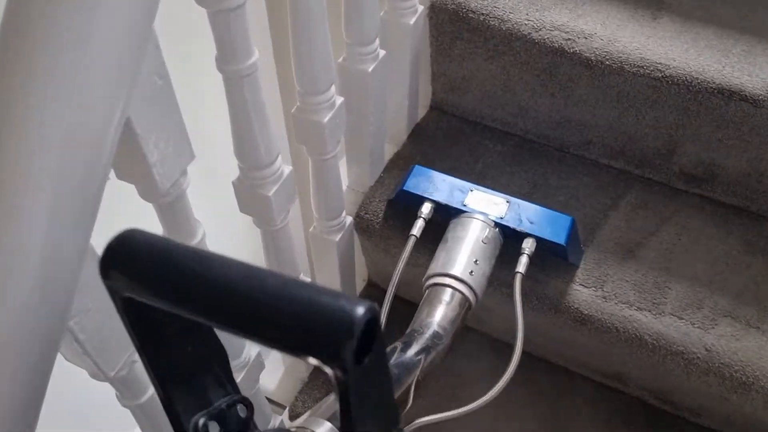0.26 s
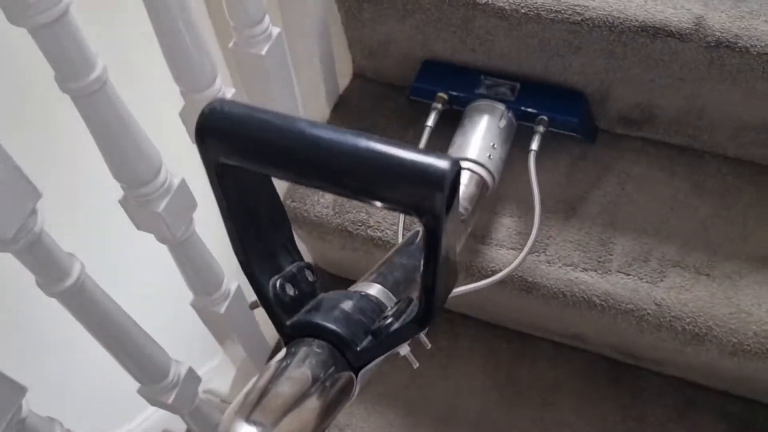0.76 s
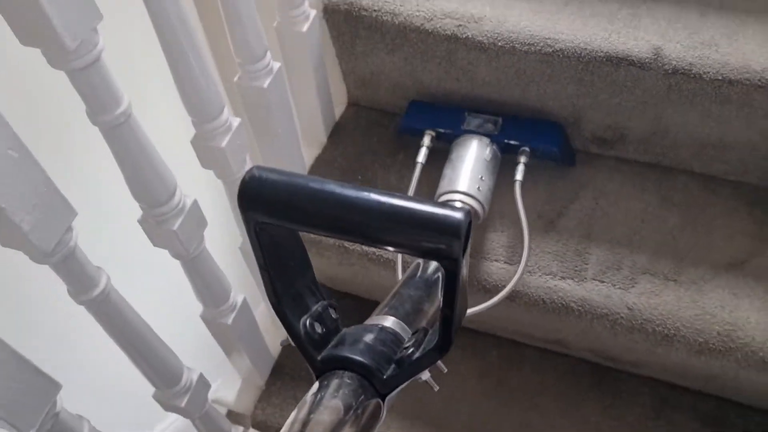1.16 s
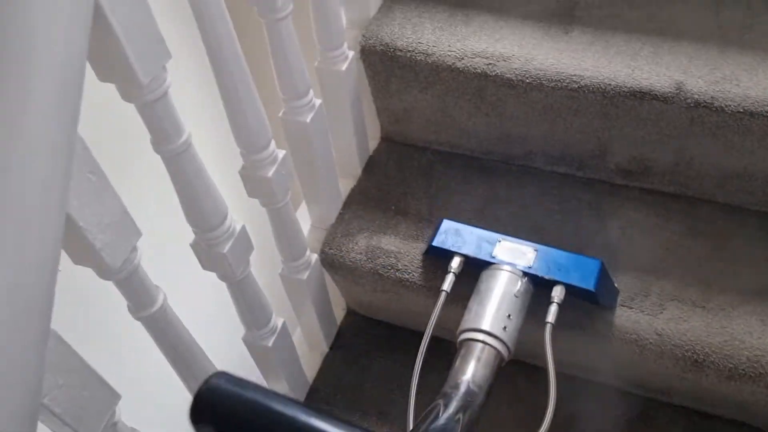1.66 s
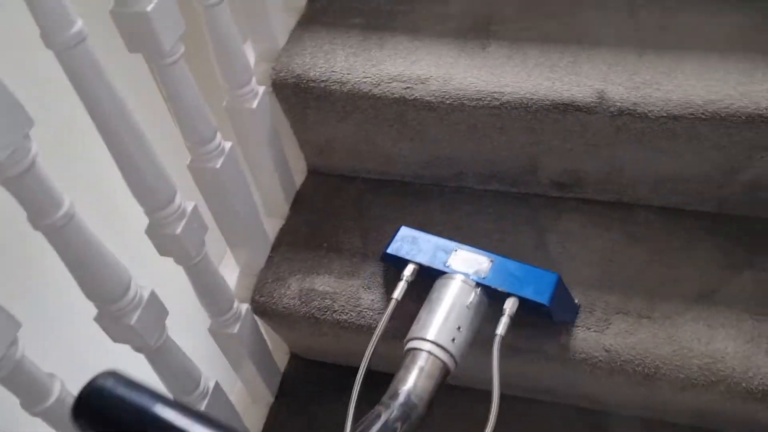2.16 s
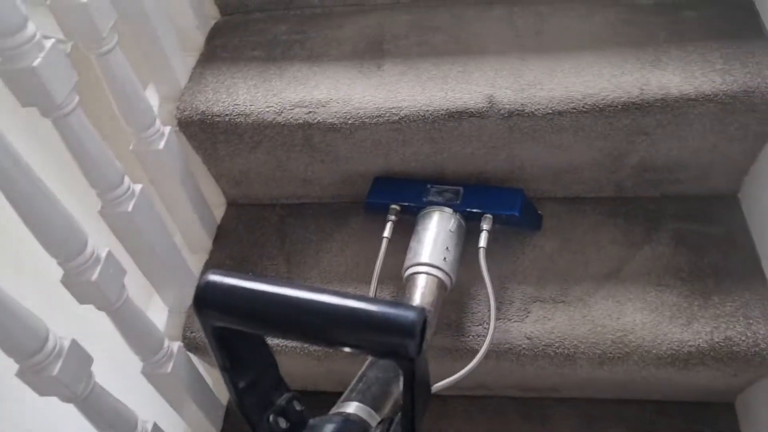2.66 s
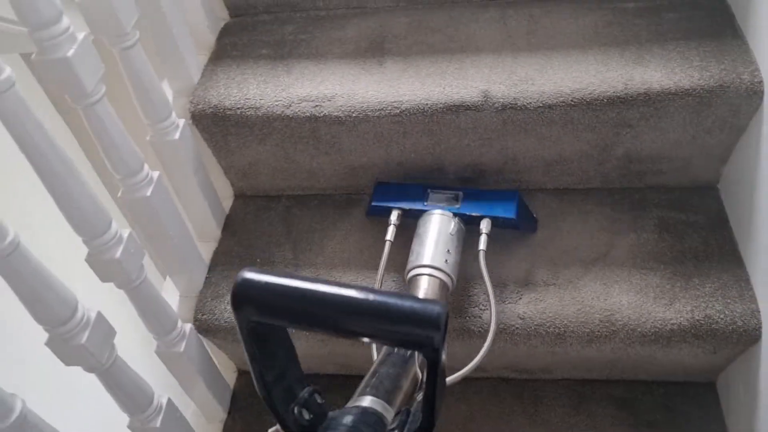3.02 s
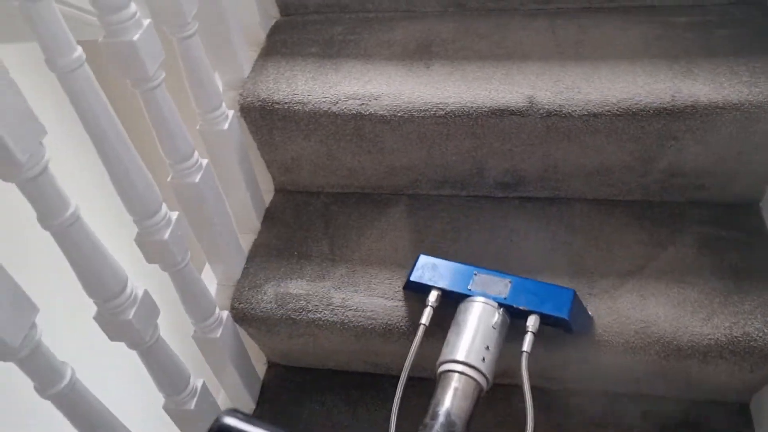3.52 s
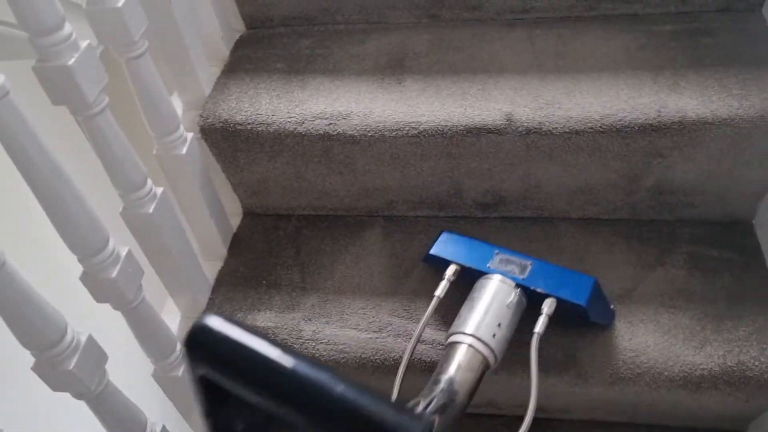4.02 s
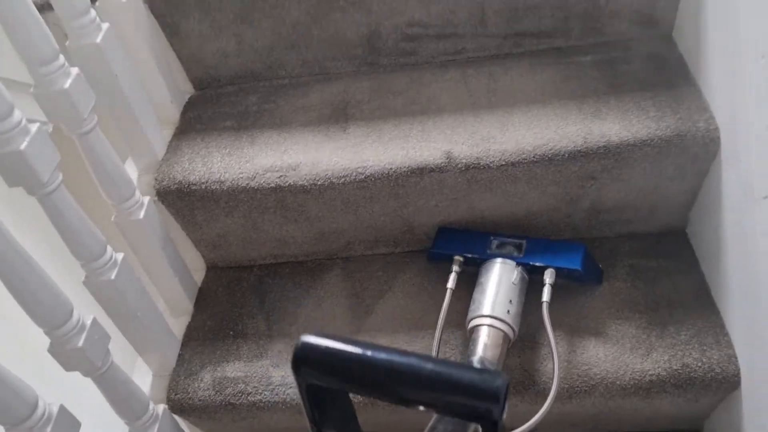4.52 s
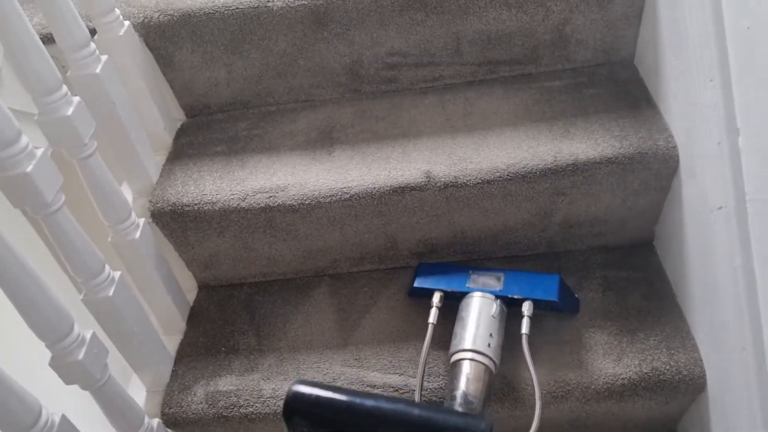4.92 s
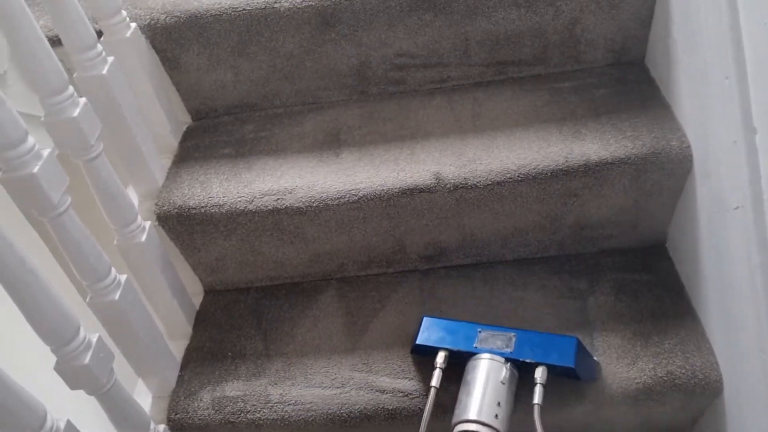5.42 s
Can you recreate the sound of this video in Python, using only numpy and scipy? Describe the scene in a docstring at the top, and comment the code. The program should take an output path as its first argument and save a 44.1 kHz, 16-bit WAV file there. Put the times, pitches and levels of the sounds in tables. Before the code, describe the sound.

A carpet-cleaning wand works on a carpeted staircase, heard close from behind the handle in stereo. Air suction rushes throughout over a dull distant vacuum drone. Three bright spray bursts open with sharp trigger clacks and wet spits; between them the head rubs forward over the pile and thuds softly against the riser. Splutters of sucked water follow the first two bursts, and knocks echo briefly in the stairwell.

```python
"""A carpet extraction wand cleans a carpeted wooden staircase, heard from just behind its handle.
The trigger valve clacks and filtered noise and droplet clicks hiss as water jets on each backward stroke.
Suction is a resonant air rush; the nozzle slurps in splutters of drops and noise at the stair's edge.
Between sprays the head rubs forward over the pile and bumps or grazes the riser: struck modes and tiny slips.
A vacuum unit drones dully underneath, and the knocks echo in the stairwell."""
import sys
import numpy as np
from scipy import signal
from scipy.fft import rfft, irfft, next_fast_len
from scipy.io import wavfile

SR = 44100
rng = np.random.default_rng(int(sys.argv[2]) if len(sys.argv) > 2 else 0)


def master(y):
    """Save y as 16-bit WAV."""
    cut = np.clip(np.atleast_2d(y).T, -1, 1)
    pcm = np.round(cut * 32767)  # scale
    wavfile.write(sys.argv[1], SR, pcm.astype(np.int16))


N = 250488
TIME = np.arange(N) / SR

# One trigger squeeze per backward stroke; a negative time lies before the start:
# (opens [s], closes [s], pressure bleed-off [s], hiss before brightening [dB], edge brightening [dB])
SQUEEZES = [(-0.9, 0.085, 0.022, -25.5, 0.5), (0.91, 1.948, 0.072, -27, 4.5),
            (2.724, 3.63, 0.067, -26.8, 2), (4.5, 5.477, 0.029, -27.5, 2.5)]
# Valve snapping: (time [s], level [dB], contact cut-off [Hz])
VALVE_SNAPS = [(.08, -5, 720), (.9166, -2, 12100), (.9195, 0, 2490), (2.7275, 1.5, 9000), (4.498, -4, 2540),
               (4.5014, -3, 12000), (4.504, -4.5, 894), (5.478, -5.5, 700)]
# Ringing modes of valve and wand tube: (frequency [Hz], level [dB], t60 [s])
WAND_MODES = [(104.3, -37, 0.084), (179, -30.5, 0.25), (236.5, -39, 0.24), (415, -27, 0.019),
              (766, -21.5, 0.016), (1350, -20, 0.012), (2050, -14.5, 0.0069), (2570, -17, 0.031),
              (3290, -15.5, 0.0048), (5100, -9, 0.0033), (6380, -5.5, 0.003), (12300, -11.5, 0.0036)]
# Head pushed forward over the pile:
# (starts [s], meets the riser [s], rubbing [dB], suction change at full speed [dB],
#  suction change against the riser [dB], slot resonance [Hz], leak whistle [Hz])
FORWARD_PUSHES = [(0.41, 0.705, -32, 1.5, -4.3, 1600, 2450), (2.24, 2.498, -39, 1.7, 0.7, 1780, 2550),
                  (4.019, 4.279, -42, 0, -3.8, 1480, 2860)]
# Head knocking on the stair: (time [s], level [dB], contact cut-off [Hz], weight on the tread [0-1])
STAIR_BUMPS = [(0.712, -5, 350, 0.8), (0.743, 1.5, 130, 0.9), (1.925, 2, 170, 0.06),
               (2.481, -7.5, 3050, 0.34), (2.509, -5.5, 150, 0.95), (2.548, -3.5, 130, 0.13),
               (4.2565, 2, 4000, 0.1), (4.282, -4.5, 800, 0.2), (4.327, -0.5, 160, .1)]
# Ringing modes of stair and nozzle head: (frequency [Hz], level [dB], t60 [s])
STAIR_MODES = [(95, -28, .24), (190, -35, .22), (310, -33, .16), (400, -30.5, .1), (520, -31, .07),
               (1330, -25, .04), (3480, -35, .12)]
# Nozzle lifting at the stair's edge:
# (starts [s], attack [s], hold [s], release [s], gargle [dB], lip flutter [dB])
NOZZLE_LIFTS = [(1.908, 0.026, 0.013, 0.044, -24, -27.5), (3.566, 0.039, 0.03, 0.05, -25, -27.5),
                (3.63, 0.09, 0.1, 0.067, -14.7, -26.3)]
# Head grazing the riser: (time [s], level [dB], decay [s])
RISER_GRAZES = [(2.476, -33.5, 0.015), (4.207, -30.5, 0.032), (4.257, -27, 0.016)]
# Resonances of the metal head under a graze: (frequency [Hz], width [Hz], level [dB])
HEAD_RESONANCES = [(1400, 530, 5), (2000, 570, -5), (3370, 190, -30)]
# Resonances of the gap between head and riser: (frequency [Hz], width [Hz], level [dB])
CORNER_RESONANCES = [(740, 520, -2), (1700, 160, -10), (3480, 210, -2), (4060, 240, -4.5)]

# Relative noise spectra of each source: (frequency [Hz], level [dB per Hz])
JET_SPECTRUM = [(150, -17.5), (650, -15), (950, -5.5), (1700, -2.5), (2150, -4.6), (3000, -1.6),
                (4100, -0.9), (4600, -3), (7700, -2.5), (8600, -8.5), (11300, -12.5), (12500, -8.5),
                (15700, -8)]
AIR_SPECTRUM = [(120, -5), (400, -9), (680, -6.5), (950, -4.5), (1250, -7), (1600, -3.5), (2200, -1.5),
                (3200, -2), (4400, -4), (7500, -8), (9000, -13.5), (11300, -13), (13000, -10), (15700, -11)]
MACHINE_SPECTRUM = [(14, -19), (50, -2), (75, -3.5), (98, 6), (125, -7), (200, -9.5), (400, -22.5)]
PILE_SPECTRUM = [(60, 4.5), (110, -1.5), (220, 5.5), (350, -3.5), (560, 1.5), (900, -4.5), (1600, -2.5),
                 (2400, -13), (4500, -29)]
GARGLE_SPECTRUM = [(330, -1.5), (470, -6.5), (750, -5), (1000, 0.5), (1300, -3.5), (1600, 3), (2000, -1),
                   (2400, 0.5), (3000, -0.8), (3500, -6.5), (4900, -5.5), (6600, -11.5), (9500, -22.5),
                   (16000, -19)]
FLUTTER_SPECTRUM = [(60, -12), (98, 5), (140, -4.5), (200, 4.5), (270, -8), (340, -7), (450, -10),
                    (1000, -25.5)]
# Likeness of the two microphones: (frequency [Hz], left-right correlation [-1 to 1])
MIC_LIKENESS = [(100, 1), (270, 1), (500, 0.4), (800, 0.4), (1200, 0.55), (1800, 0.5), (2400, 0.15),
                (4000, 0.18), (16000, 0.05)]
# Stereo balance of the spray: (frequency [Hz], left minus right [dB])
SPRAY_BALANCE = [(300, 2), (600, -3), (1200, 1), (1700, -11), (2600, -1.5), (4300, -7.5), (5200, -3),
                 (6800, 1.5), (8600, -1), (10400, -5.5), (11300, 3), (12500, -5.5), (15000, 1.5)]
# Stereo balance of the other noises: (frequency [Hz], left minus right [dB])
NOISE_BALANCE = [(60, 2), (180, -3.5), (550, 0), (1700, -4.5), (5000, -2), (15000, -2)]

LEFT_LAG_S = 0.00036   # the wand is a little to the right
VALVE_TRAVEL_S = 0.011   # from shut to fully open
EDGE_S, EDGE_RISE_S = 0.37, 0.27   # jets near the edge this long before closing; on it this much later
PUSH_CURVE, PUSH_STOP_S = 0.4, 0.05   # speed: power of the way covered; decay on meeting the riser
SEAL_S = 0.052   # the slot closes on the carpet in this time
TREAD_HZ, TREAD_DB, TREAD_T60_S = 54, -20.5, .5   # boom of a wooden step
FLUTTER_STOP_S = 0.034   # the lip settles sooner than the water
STAIRWELL_T60_S = 0.21
END_S, CUTOFF_HZ = 5.648, 15850


def from_db(db):
    """Decibels to gain."""
    return 10 ** (np.asarray(db) / 20)


def rms_one(x):
    """Scale to rms 1."""
    return x / np.sqrt(np.mean(x ** 2) + 1e-20)


def at_hz(points, hz):
    """Read a table on a log-frequency axis."""
    f, value = np.transpose(points)
    return np.interp(np.log(hz), np.log(f), value)


def cut(x, hz, kind, order=2):
    """Butterworth filter."""
    sos = signal.butter(order, np.clip(hz, 10, .45 * SR), kind, fs=SR, output="sos")
    return signal.sosfilt(sos, x + 1e-18)


def rush(x, hz, width_hz):
    """A broad resonance with gain 1 on top."""
    r = np.exp(-np.pi * width_hz / SR)
    top = np.array([1, 0, -1]) * (1 - r * r) / 2
    return signal.lfilter(top, [1, -2 * r * np.cos(2 * np.pi * hz / SR), r * r], x)


def ring(force, hz, t60):
    """A unit click sets a sine of height 1 ringing."""
    r, w = from_db(-60 / (t60 * SR)), 2 * np.pi * hz / SR
    return signal.lfilter([0, np.sin(w)], [1, -2 * r * np.cos(w), r * r], force + 1e-18)


def drift(rate):
    """Smooth chance of rms 1, changing about rate times a second."""
    step = 40   # samples between slow values
    r = np.exp(-2 * np.pi * rate * step / SR)
    chance = rng.standard_normal(N // step + 2002)
    slow = signal.lfilter([1], [1, -2 * r, r * r], chance)[2000:]   # drop the settling
    return np.interp(np.arange(N) / step, np.arange(len(slow)), rms_one(slow))


def turbulence():
    """Two unrelated white noises."""
    return rng.standard_normal((2, N))


def drops(per_s, spread_db):
    """Two random trains of droplet impacts of uneven size, at rms 1."""
    sizes = from_db(spread_db * np.minimum(rng.exponential(1, (2, N)), 4))
    landing = rng.random((2, N)) < per_s / SR
    return rms_one(landing * sizes * rng.choice([-1, 1], (2, N)))


def colour(pair, spectrum, balance):
    """Give two unrelated signals a spectrum and spread them over the microphones; rms 1."""
    size = next_fast_len(N)
    hz = np.maximum(np.fft.rfftfreq(size, 1 / SR), 1)
    bass_fall = np.minimum(hz / spectrum[0][0], 1) ** 2   # below the first point
    mid, side = rfft(pair, size) * from_db(at_hz(spectrum, hz)) * bass_fall
    alike = np.clip(at_hz(MIC_LIKENESS, hz), -1, 1)
    sides = np.array([[1], [-1]])
    both = np.sqrt(1 + alike) * mid + sides * np.sqrt(1 - alike) * side
    both = both * from_db(sides * at_hz(balance, hz) / 2)
    both[0] *= np.exp(-2j * np.pi * hz * LEFT_LAG_S)
    return rms_one(irfft(both, size)[:, :N])


def near_walls(x, echo, sway_s, count=4):
    """Echoes off steps and banister comb the hiss; their paths shift as the wand moves."""
    out, travel = x.copy(), drift(.4)
    for channel in range(2):
        for lag_s in rng.uniform(.001, .012, count):
            path_s = lag_s + sway_s * rng.normal() * travel
            source = np.arange(N) - np.round(path_s * SR).astype(int)
            out[channel] += echo * x[channel, np.clip(source, 0, N - 1)]
    return rms_one(out)


def ramp(s, length_s):
    """Straight rise from zero at s seconds to one, length_s later."""
    return np.clip((TIME - s) / length_s, 0, 1)


def release(s, decay_s):
    """One until s seconds, then dying away exponentially."""
    return np.exp(-np.maximum(TIME - s, 0) / decay_s)


def since(s, decay_s=np.inf):
    """Rises from zero to one as the valve opens around s seconds, dying away if given a decay."""
    return ramp(s - VALVE_TRAVEL_S / 2, VALVE_TRAVEL_S) ** 2 * release(s, decay_s)


def push_speed(starts, stops):
    """The head gathers speed, from zero to one, until the riser stops it."""
    return ramp(starts, stops - starts) ** PUSH_CURVE * release(stops, PUSH_STOP_S)


def jets(droplets=0.6, sizzle_db=-3.3, mist_db=-3, fresh_mist_db=6, fresh_s=0.44,
         edge_hiss=-0.13, edge_mist=0.88, retreat_s=0.73, waver_db=1.7):
    """Water atomises finest just as the valve opens, brightens at the edge and dies as pressure bleeds off."""
    water = turbulence() + droplets * drops(5000, spread_db=2.5)
    spray = near_walls(colour(water, JET_SPECTRUM, SPRAY_BALANCE), echo=0.18, sway_s=.0002)
    gains, in_corner = np.zeros((3, 1, N)), 0   # hiss, sizzle and fine mist
    for opens, closes, bleed_s, level_db, edge_db in SQUEEZES:
        pressure = since(opens) * release(closes, bleed_s)
        bright = edge_db * np.sin(np.pi / 2 * ramp(closes - EDGE_S, EDGE_RISE_S)) ** 2
        mist = mist_db + fresh_mist_db * release(opens, fresh_s) + edge_mist * bright
        bands_db = [edge_hiss * bright, sizzle_db + bright, mist]
        gains[:, 0] += pressure * from_db(level_db) * from_db(bands_db)
        in_corner = in_corner + since(opens, retreat_s)

    spectrum, hz = rfft(spray), np.fft.rfftfreq(N, 1 / SR)
    band = np.digitize(hz, [5000, 9000])   # hiss | sizzle | mist
    out = sum(gain * rms_one(irfft(spectrum * (band == k), N)) for k, gain in enumerate(gains))

    # the gap between head and riser resonates, wavering, until the head is drawn back
    corner = 0
    for hz, width_hz, db in CORNER_RESONANCES:
        corner = corner + from_db(db + waver_db * drift(1.5)) * rush(out, hz, width_hz)
    return out + in_corner * corner


def suction(level_db=-35.9, wet_db=1.8, clear_s=0.13, droplets=0.68,
            tube_db=-7, tube_hz=1580, tube_width_hz=130, slot_db=-3, slot_width_hz=200,
            leak_db=-5, leak_width_hz=150, hollow_db=2, hollow_hz=520, hollow_width_hz=350):
    """Air and drops rush through slot and tube: louder while wet, resonant on a push, whistling at the riser."""
    flow = turbulence() + droplets * drops(2500, spread_db=7)
    air = colour(flow, AIR_SPECTRUM, NOISE_BALANCE)
    air = air + from_db(tube_db) * rush(air, tube_hz, tube_width_hz)
    wet = sum(since(opens) * release(closes, clear_s) for opens, closes, *_ in SQUEEZES)
    flow_db = level_db + wet_db * wet
    slot, hollow = 0, from_db(hollow_db) * rush(air, hollow_hz, hollow_width_hz)
    # each push ends its seal when the next squeeze opens
    for push, (opens, *_) in zip(FORWARD_PUSHES, SQUEEZES[1:]):
        starts, stops, _, push_db, seal_db, slot_hz, leak_hz = push
        speed = push_speed(starts, stops)
        sealed = ramp(stops, SEAL_S) * (1 - since(opens))
        flow_db = flow_db + push_db * speed + seal_db * sealed
        slot = slot + from_db(slot_db) * speed * rush(air, slot_hz, slot_width_hz)
        leak = from_db(leak_db) * rush(air, leak_hz, leak_width_hz)
        slot = slot + sealed * (leak + hollow)
    return from_db(flow_db) * near_walls(air + slot, echo=0.38, sway_s=.0001)


def machine(level_db=-47.5):
    """The vacuum unit drones dully from another room, as low-pitched noise."""
    return from_db(level_db) * colour(turbulence(), MACHINE_SPECTRUM, NOISE_BALANCE)


def strike(hits, modes, chatter, chatter_s):
    """Each blow is a click and a short chatter, dulled by a soft contact, that rings the modes."""
    force, age = np.zeros((2, N)), TIME[:SR // 10]
    for s, level_db, soft_hz, *_ in hits:
        rattle = chatter * rng.standard_normal((2, len(age))) * np.exp(-age / chatter_s)
        blow = cut(rattle, 390, "high")
        blow[:, 0] += 1   # the click
        start = round(s * SR)
        force[:, start:start + len(age)] += from_db(level_db) * cut(blow, soft_hz, "low")[:, :N - start]
    # neighbouring modes start in opposite directions
    return sum((-1) ** k * from_db(db) * ring(force, hz, t60) for k, (hz, db, t60) in enumerate(modes))


def valve_clacks():
    """The trigger valve snaps, ringing its own body and the wand tube."""
    return strike(VALVE_SNAPS, WAND_MODES, chatter=0.17, chatter_s=0.0041)


def stairwell(x, count=8):
    """Feedback delays of unrelated lengths, other ones on each side, return the knocks as echoes."""
    out = np.zeros((2, N))
    lags = (rng.uniform(.006, .035, 2 * count) * SR).astype(int)
    for k, lag in enumerate(lags):
        loop, gain = x[k % 2].copy(), from_db(-60 * lag / SR / STAIRWELL_T60_S)
        for i in range(lag, N, lag):
            loop[i:i + lag] += gain * loop[i - lag:i][:N - i]
        out[k % 2] += (loop - x[k % 2]) * (-1) ** (k // 2)   # echoes only
    return cut(out, 136, "high")


def rubbing(zip_share=0.4, start_hz=420, rise_hz_per_s=1150, width_hz=150):
    """Tufts flick past the nozzle's lip; their zipping rises in level and pitch during the push."""
    tufts = colour(drops(2500, spread_db=4.0), PILE_SPECTRUM, NOISE_BALANCE)
    brush = near_walls(tufts, echo=0.2, sway_s=.0003)
    unevenness, out = rms_one(cut(turbulence(), width_hz / 2, "low")), 0
    for starts, stops, level_db, *_ in FORWARD_PUSHES:
        tufts_hz = start_hz + rise_hz_per_s * np.clip(TIME - starts, 0, stops - starts)
        zipping = np.sqrt(2) * unevenness * np.sin(2 * np.pi * np.cumsum(tufts_hz) / SR)
        out = out + from_db(level_db) * push_speed(starts, stops) * (brush + zip_share * zipping)
    return out


def head_knocks():
    """The head bumps the stair, ringing wood and nozzle together."""
    return strike(STAIR_BUMPS, STAIR_MODES, chatter=0.024, chatter_s=0.0072)


def tread():
    """Blows with weight behind them set the whole wooden step booming."""
    force = np.zeros(N)
    for s, level_db, _, weight in STAIR_BUMPS:
        force[round(s * SR)] += weight * from_db(level_db + TREAD_DB)
    return ring(cut(force, 96, "low"), TREAD_HZ, TREAD_T60_S)


def slurp(splutter_db=0.95, airy=0.55, tube_db=-4, tube_hz=2340, tube_width_hz=130,
          spit_db=-16, spit_s=0.0056, jolt_db=-27, jolt_s=0.05):
    """Where the seal breaks, water is torn off the pile in dense splutters and the nozzle's lip flutters."""
    gargle_gain = flutter_gain = 0
    for s, attack_s, hold_s, release_s, gargle_db, flutter_db in NOZZLE_LIFTS:
        rise, ends = ramp(s, attack_s), s + attack_s + hold_s
        gargle_gain = gargle_gain + from_db(gargle_db) * rise * release(ends, release_s)
        flutter_gain = flutter_gain + from_db(flutter_db) * rise * release(ends, FLUTTER_STOP_S)
    for opens, *_ in SQUEEZES[1:]:   # the first slug of water spits out and jolts the head
        gargle_gain = gargle_gain + from_db(spit_db) * since(opens, spit_s)
        flutter_gain = flutter_gain + from_db(jolt_db) * since(opens, jolt_s)

    gulps = rms_one(from_db(splutter_db * drift(56)))
    water = drops(5000, spread_db=3.8) + airy * turbulence()
    gargle = colour(water, GARGLE_SPECTRUM, NOISE_BALANCE)
    gargle = gargle + from_db(tube_db) * rush(gargle, tube_hz, tube_width_hz)
    gargle = near_walls(gargle, echo=0.39, sway_s=.0001)
    flutter = colour(turbulence(), FLUTTER_SPECTRUM, NOISE_BALANCE)
    return gulps * (gargle_gain * gargle + flutter_gain * flutter)


def scuff(attack_s=0.004):
    """The metal head grazes the riser in short, dying runs of tiny slips."""
    slips = drops(2000, spread_db=2)
    body = sum(from_db(db) * rush(slips, hz, width_hz) for hz, width_hz, db in HEAD_RESONANCES)
    contact = 0
    for s, db, decay_s in RISER_GRAZES:
        contact = contact + from_db(db) * ramp(s - attack_s, attack_s) * release(s, decay_s)
    return contact * rms_one(body)


def scene():
    """Wand noises, with the knocks and scuffs echoing in the stairwell."""
    bumps = head_knocks() + tread() + scuff()
    knocks = (valve_clacks() + bumps) * from_db([[-.5], [.5]])   # a little to the right
    echoes = from_db(-9.5) * stairwell(knocks)
    return jets() + suction() + machine() + knocks + echoes + rubbing() + slurp()


def record(dry):
    """The sound stops short in a brief fade, and the top is cut."""
    fade = np.clip((END_S - TIME) / .008, 0, 1)
    top_cut = signal.ellip(12, .1, 80, CUTOFF_HZ, fs=SR, output="sos")
    return signal.sosfilt(top_cut, dry * fade)


dry = scene()
out = record(dry)
master(out)
```